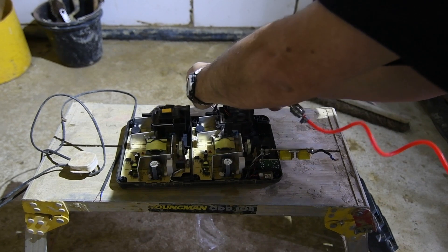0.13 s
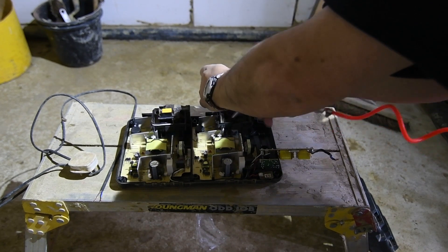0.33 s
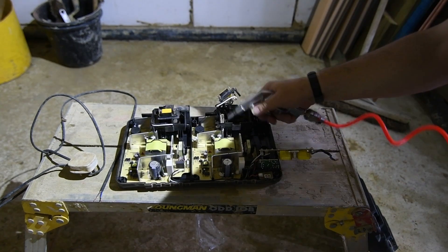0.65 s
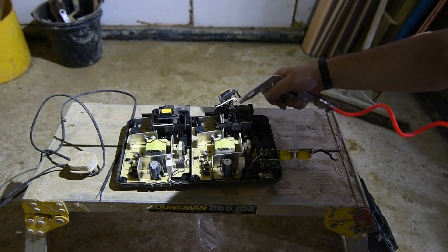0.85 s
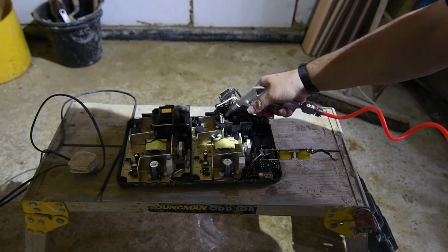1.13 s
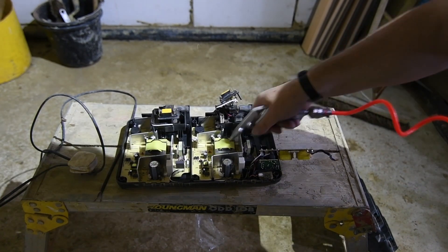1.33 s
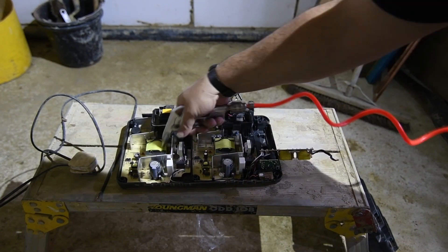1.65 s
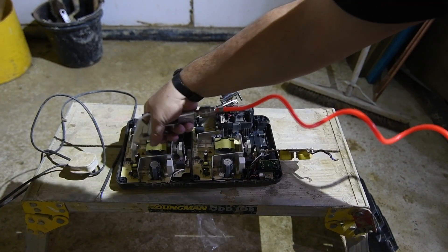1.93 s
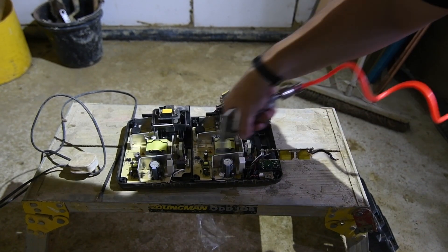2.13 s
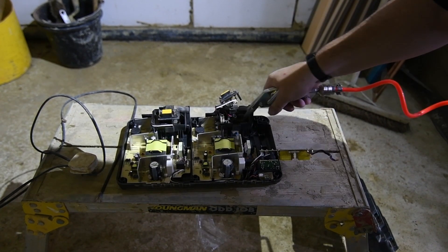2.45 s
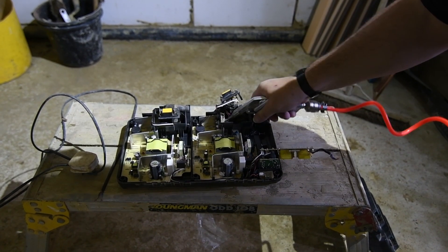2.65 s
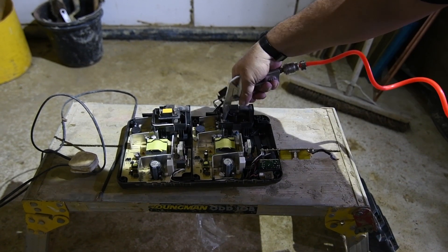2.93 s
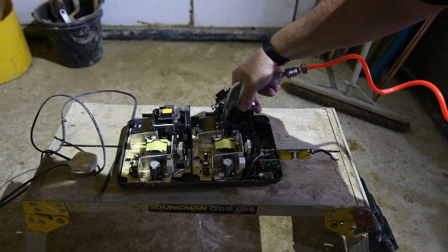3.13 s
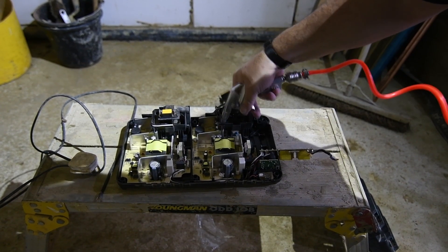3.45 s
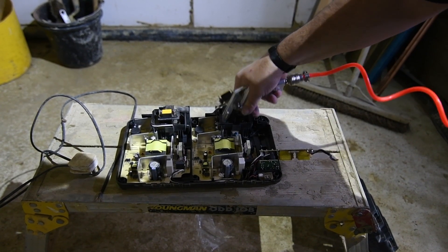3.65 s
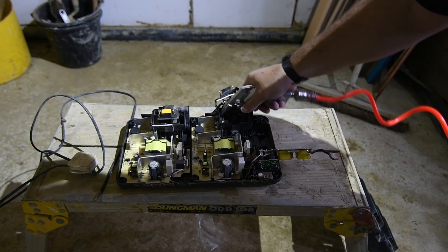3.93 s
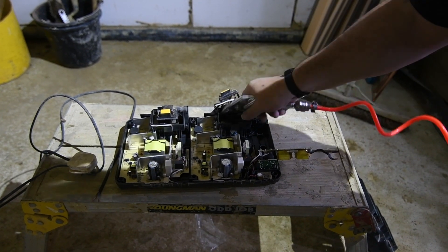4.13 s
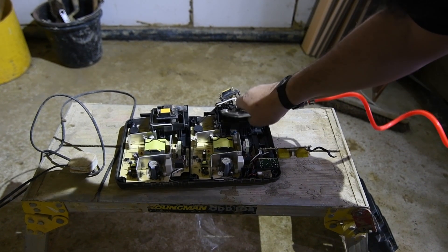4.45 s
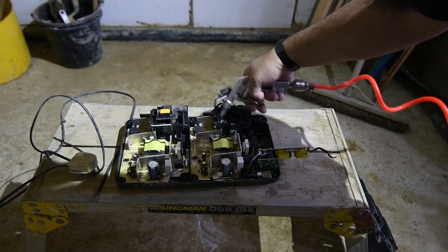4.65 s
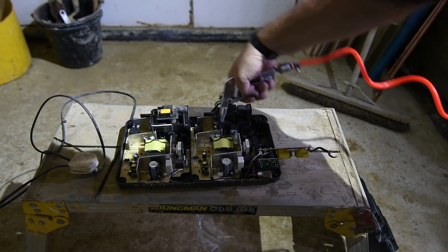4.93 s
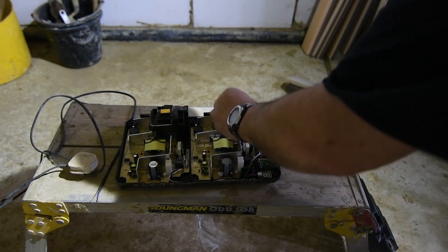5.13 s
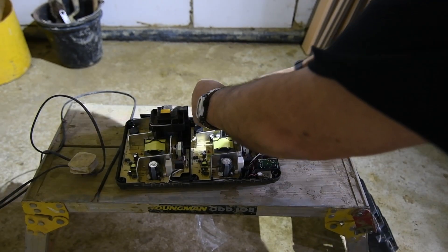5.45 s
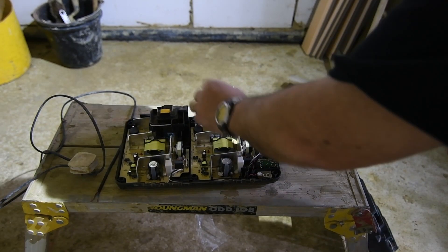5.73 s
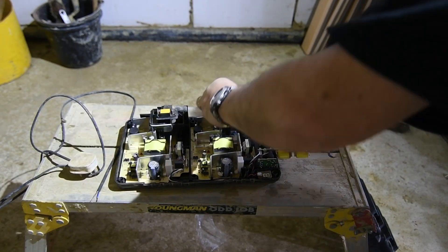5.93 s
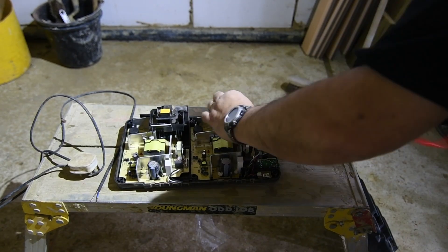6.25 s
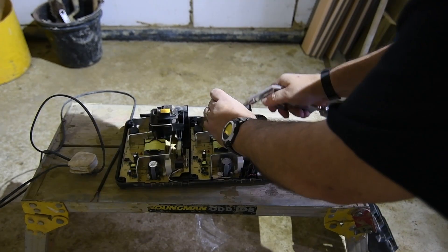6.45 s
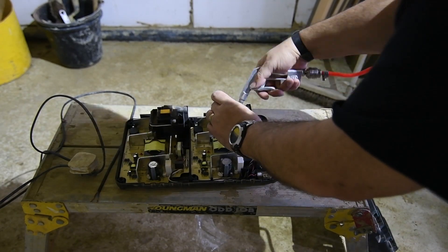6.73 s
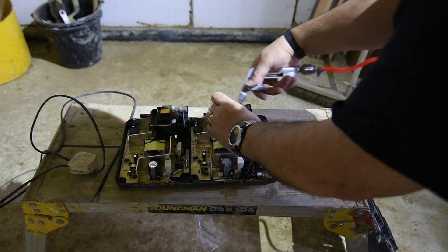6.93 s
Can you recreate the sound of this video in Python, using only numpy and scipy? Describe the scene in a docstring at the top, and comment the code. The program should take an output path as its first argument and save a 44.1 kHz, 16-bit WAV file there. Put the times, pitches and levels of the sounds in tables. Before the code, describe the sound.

Close recording of compressed air cleaning an electronic device. Harsh, treble-heavy jets start and stop abruptly, first in quick squirts, then in a long blast with shifting whistles. Hard dry spits sputter and quicken before further jets. Between them the steady buzzing whine of a small motor stands exposed, with a few tiny metallic ticks; a last blast runs to the end. Little room echo, both channels alike, loud peaks compressed.

```python
"""In a workshop, a small motor whines on while a blow gun clears dust from a battery charger's circuit boards.
The whine is a stack of wavering partials, with steady tones and a rush of noise ringing in the casing.
The jet is shaped noise in blasts; it howls through resonances where it meets gaps between parts.
Short hard spits, probably of air, and bright metallic ticks are dying noise; one run of spits quickens.
A fast compressor pushes the whine down under hard jets."""
import sys
import numpy as np
from scipy import signal
from scipy.fft import rfft, irfft
from scipy.io import wavfile
from scipy.ndimage import uniform_filter1d, map_coordinates

SR = 44100
rng = np.random.default_rng(int(sys.argv[2]) if len(sys.argv) > 2 else 0)


def output_pcm(signal):
    """Save a mono or channel-first signal as 16-bit PCM at the path in sys.argv[1].

    Samples are clipped to [-1, 1] before scaling.
    """
    pcm = np.clip(np.atleast_2d(signal).T, -1, 1) * 32767
    wavfile.write(sys.argv[1], SR, np.round(pcm).astype(np.int16))


N = 312228
T = np.arange(N) / SR   # s
HZ = np.maximum(np.arange(N // 2 + 1) * SR / N, 1)


def from_db(db):
    """Decibels to amplitude gain."""
    return 10 ** (np.asarray(db) / 20)


def rms_one(x):
    """Scale to rms 1."""
    return x / np.sqrt(np.mean(x ** 2) + 1e-20)


def in_time(rows):
    """Each column of a curve after t, drawn sample by sample."""
    s, *columns = np.transpose(rows)
    return [np.interp(T, s, column) for column in columns]


def colour(points):
    """Gain at every frequency, drawn between the points of a spectrum on a log frequency scale."""
    hz, db = np.transpose(points)
    return from_db(np.interp(np.log(HZ), np.log(hz), db))


def filtered(x, gain):
    """Apply a gain at every frequency."""
    return irfft(rfft(x) * gain, N)


def noise(gain):
    """Noise of a given colour, rms 1."""
    return rms_one(filtered(rng.standard_normal(N), gain))


def drift(rate_hz):
    """Slow random movement with rms 1, mostly below the given rate."""
    return noise(1 / (1 + (HZ / rate_hz) ** 2))


def resonate(x, hz, width):
    """One two-pole resonance with gain near 1 at its peak."""
    r = np.exp(-np.pi * width / SR)
    feedback = [1, -2 * r * np.cos(2 * np.pi * hz / SR), r * r]
    return signal.lfilter([(1 - r * r) / 2, 0, (r * r - 1) / 2], feedback, x)


def band(hz, width):
    """Noise through a resonance applied twice, rms 1."""
    once = resonate(rng.standard_normal(N), hz, width)
    return rms_one(resonate(once, hz, width))


def dying(s, t60):
    """Envelope of a burst at time s: instant start, exponential decay, cut after a quarter second."""
    envelope = np.zeros(N)
    start = round(s * SR)
    age = T[:min(SR // 4, N - start)]
    envelope[start:start + len(age)] = from_db(-60 * age / t60)
    return envelope


def workshop(x, wet_db, t60=0.07):
    """A short diffuse tail from the walls: decaying noise that starts 4 ms after the direct sound."""
    age = T[:SR // 2]
    tail = rng.standard_normal(len(age)) * from_db(-60 * age / t60) * (age > .004)
    tail = tail / np.sqrt(np.sum(tail ** 2))
    return x + from_db(wet_db) * signal.fftconvolve(x, tail)[:N]


# steady tones beside the whine: [f/Hz, rms level/dB]
SIDE_TONES = [(1200, -62.5), (5482, -47)]


def side_tones():
    """Pure tones that hold their pitch and level."""
    return np.sqrt(2) * sum(from_db(db) * np.sin(2 * np.pi * hz * T) for hz, db in SIDE_TONES)


# fundamental of the motor: [t/s, f/Hz]
MOTOR_SPEED = [(0, 279.0), (2.9, 279.2), (3.25, 279.3), (3.6, 278.8), (4.6, 278.6), (5.0, 278.7),
               (5.9, 278.6), (6.4, 278.8), (7.08, 278.7)]
# partials in rising order from 1: [multiple of the fundamental, relative level/dB]
WHINE_PARTIALS = [(1, -41.5), (2, -24), (3, -26), (4, -21), (5, -4.5), (6, -3.5), (7, -13), (8, -18.5),
                  (9, -9), (10, -12), (11, -16), (12, -15), (13, -13), (14, -16.5), (15, -13.5),
                  (16, -17.5), (17, -12.5), (18, -9.5), (19, -2), (20, -11.5), (21, -6.5), (22, -13),
                  (23, -19), (24, -25), (25, -17), (26, -48), (27, -45), (28, -13), (29, -16), (30, -22),
                  (31, -16), (32, -12), (33, -41), (34, -26), (35, -21), (36, -25), (37, -48), (38, -41),
                  (39, -19), (40, -20), (41, -26), (42, -39), (43, -30), (44, -37), (45, -17)]
# partials that follow the lean: [multiple, level change/dB at lean 0, level change/dB at lean 1]
LEAN_SHADING = [(4, 3, -10.5), (5, 0, 2.5), (6, 0, -1), (8, 1, 14.5), (9, 2.5, -10), (10, 0.5, 7),
                (11, 2, 5), (12, 5.5, -5), (15, 2.5, -3.5), (33, 12, -9)]
# the body leans to and fro and shifts the room's standing waves: [t/s, lean 0-1]
BODY_LEAN = [(0, 0.12), (1.1, 0.17), (2.3, 0.6), (2.6, .85), (3.05, 0.97), (3.5, 0.38), (4.3, 0.34),
             (4.9, 0.66), (5.45, 0.4), (6.0, 0.13), (7.08, 0.03)]
# the casing's ring near 5 kHz comes and goes: [t/s, level change/dB]
CASING_RING = [(0, 2.5), (1.1, 5.5), (1.6, -1), (2.4, -1), (2.65, 0.5), (3.5, -3), (4.1, -4), (5.1, -3),
               (5.3, 2), (5.6, 0.5), (5.95, 3.5), (6.38, 2), (6.6, -3.5), (7.08, -1)]


def whine(level_db=-36, jitter=0.00082, waver_db=1.34, fading_db=1.0):
    """Clean motor partials; high ones waver more, and each fades slowly as the standing waves shift."""
    (speed_hz,), (lean,), (ring_db,) = in_time(MOTOR_SPEED), in_time(BODY_LEAN), in_time(CASING_RING)
    phase = 2 * np.pi * np.cumsum(speed_hz * (1 + jitter * drift(23.8))) / SR
    shade_db = {round(k): upright_db + (leaning_db - upright_db) * lean
                for k, upright_db, leaning_db in LEAN_SHADING}
    # partials 18 to 21 lie around the casing's ring
    shade_db.update({18: ring_db / 2, 19: ring_db, 20: ring_db, 21: ring_db / 2})
    # groups of partials share their movements
    wavers = [drift(6) for _ in range(7)]
    fades = [fading_db * drift(.8) for _ in range(5)]
    out = np.zeros(N)
    for k, (_, db) in enumerate(WHINE_PARTIALS, 1):
        height = min(k / 20, 1.5)
        waver = height * waver_db * wavers[k % len(wavers)]
        shade = shade_db.get(k, height * fades[k % len(fades)])
        tone = np.sin(k * phase + rng.uniform(0, 2 * np.pi))
        out += from_db(db + level_db + waver + shade) * tone
    return np.sqrt(2) * out   # table levels count as rms


# colour of the motor's noise before the casing: [f/Hz, relative level per Hz/dB]
RUSH_COLOUR = [(150, -5), (400, -31), (800, -14), (1300, -8.5), (2200, 0.5), (3700, -1.5), (4500, 1),
               (7000, -1), (10000, 0.5), (10800, -4), (12000, -0.5), (13200, -3), (14200, 1), (15000, 3),
               (15700, -27)]
# resonances of the casing: [f/Hz, width/Hz, peak level/dB]
CASING_MODES = [(2345, 97, 3.7), (2787, 120, 16.2), (3350, 87, 13.3), (3960, 220, 10), (5260, 180, 20.9),
                (5910, 130, 15.4), (6240, 140, 5.1), (8300, 130, 16), (9330, 210, 16.4), (12600, 130, 2.1)]


def rush(level_db=-38.0, roughness_db=2.0, lean_db=4.0, treble_lean_db=-2.0):
    """The motor's rough noise, ringing in its casing and shaded by the lean and the ring."""
    casing_power = 1 + sum((from_db(db) ** 2 - 1) / (1 + (2 * (HZ - hz) / width) ** 2) ** 1.7
                           for hz, width, db in CASING_MODES)
    (lean,), (ring_db,) = in_time(BODY_LEAN), in_time(CASING_RING)
    low_cut = 1 / (1 + (250 / HZ) ** 6)
    whole = noise(colour(RUSH_COLOUR) * np.sqrt(np.abs(casing_power)) * low_cut)
    low, below_treble = [filtered(whole, 1 / (1 + (HZ / hz) ** 12)) for hz in (3600, 7000)]
    middle, treble = below_treble - low, whole - below_treble
    out = low * from_db(lean_db * lean) + middle * from_db(0.18 * ring_db)
    out += treble * from_db(treble_lean_db * (lean - 2.0))
    return from_db(level_db + roughness_db * drift(70)) * out


# light metallic ticks as the hand moves: [t/s, level before the low cut/dB, f/Hz]
TICKS = [(5.606, -26, 10800), (5.641, -28, 10100), (5.668, -33, 13600)]


def ticks(t60=0.036, width=2500):
    """Small bright touches of metal: dying bands of noise with the lows cut."""
    touches = sum(from_db(db) * dying(s, t60) * band(hz, width) for s, db, hz in TICKS)
    return signal.sosfilt(signal.butter(2, 5000, "high", fs=SR, output="sos"), touches)


# dull pops as the blast catches the case: [t/s, level/dB, decay t60/s]
POPS = [(1.658, -13, 0.005), (6.906, -29, 0.03)]


def pops(top_hz=3400):
    """A short push on the case: dying noise, dull in tone."""
    push = sum(from_db(db) * dying(s, t60) for s, db, t60 in POPS)
    return push * noise(1 / (1 + (HZ / top_hz) ** 8))


def quickening_spits(count=12, start_s=3.184, gap_s=.0229, quickens_s=.00048, t60=.034):
    """A quickening run of short spits, probably of air, mostly growing harder."""
    k = np.arange(count)
    s = start_s + gap_s * k - quickens_s * k * (k - 1) / 2
    first_db, last_db, scatter_db = -24, -16.5, 1.0   # relative, like the other spits
    db = np.linspace(first_db, last_db, count) + scatter_db * rng.standard_normal(count)
    return [(at, level, t60) for at, level in zip(s, db)]


# short hard spits, probably air spurting from the trigger or nozzle: [t/s, relative level/dB, decay t60/s]
SPITS = [(0.484, -16, 0.037), (0.529, -20, 0.039), (2.455, -27, 0.024), (2.905, -21, .02),
         (3.161, -21, 0.089), (3.4606, -22, 0.074), (3.5085, -28, 0.031), (3.5768, -29, 0.027),
         (3.6091, -17.5, .016), (3.6531, -20.5, 0.056), (3.6979, -19, 0.068), (3.7203, -18, 0.062),
         (3.7862, -15, 0.024), (3.95, -14, 0.049), (4.181, -27, .03), (4.245, -17, 0.073),
         (4.556, -18, 0.037), (4.629, -20, .025), (4.661, -19, 0.066), (4.718, -12, 0.0097),
         (4.868, -21, 0.038), (4.94, -19, 0.029), (5.296, -25, 0.091), (6.906, -11, 0.053)]
# colour of every spit and rattle: [f/Hz, relative level per Hz/dB]
SPIT_COLOUR = [(40, -38), (250, -42), (700, -14), (1800, -11), (2350, 0.5), (2800, 9.5), (3500, 1.5),
               (4500, 5), (6200, 10), (8000, 5), (10500, 6.5), (12500, -2), (16000, -2.5)]


def spits(air, level_db=1, edge_db=-8, edge_t60=0.0095, rattles_per_s=22, rattle_db=-25,
          rattle_t60=0.021):
    """Short hard spits: dying noise with a faster edge; the air also rattles small parts at random."""
    bursts = np.zeros(N)
    for s, db, t60 in [*SPITS, *quickening_spits()]:
        bursts += from_db(db) * (dying(s, t60) + from_db(edge_db) * dying(s, edge_t60))
    struck = rng.random(N) < rattles_per_s / SR
    rattles = struck * np.minimum(air, 1) * from_db(rattle_db + rng.uniform(-16, 2.9, N))
    decay = from_db(-60 / (rattle_t60 * SR))   # per sample
    bursts += signal.lfilter([1], [1, -decay], rattles + 1e-18)
    return from_db(level_db) * bursts * noise(colour(SPIT_COLOUR))


# trigger held: [opens t/s, closes t/s, base level/dB, level change over the blast/dB, base nozzle sizzle/dB]
BLASTS = [(0.0, 0.133, -15.5, 0, 0), (0.158, 0.198, -20.5, 4, 1.5), (0.212, 0.252, -14.5, 5, -4),
          (0.27, .535, -19, -8, 1), (.615, 0.815, -17, 1, 3), (0.858, 0.95, -18.5, 4, 1.5),
          (0.983, 1.328, -18, -6.5, 1), (1.354, 2.888, -19.5, -2.5, 4.5), (2.888, 2.928, -38, 0, 15),
          (2.93, 3.029, -23, 2, 5), (3.855, 4.211, -18.5, 1.5, 1.5), (4.343, 4.865, -21, 7, 2),
          (4.884, 5.082, -16, 5, 3), (5.314, 5.523, -17, 1, 0), (6.441, 7.077, -19, 1.5, 0)]


def valve(open_s=.0028, close_t60=0.053, kick_db=6, kick_s=0.02, refill_s=0.028):
    """The valve snaps open with a kick of stored pressure, which a pause refills, and closes more softly."""
    flow, closed = np.zeros(N), -1
    for opens, closes, *_ in BLASTS:
        age = np.maximum(T - opens, 0)
        stored = min((opens - closed) / refill_s, 1)
        kick = from_db(stored * kick_db * np.exp(-np.minimum(age / kick_s, 20)))
        closing = from_db(-60 * np.clip((T - closes) / close_t60, 0, 2))
        flow += np.minimum(age / open_s, 1) * kick * closing
        closed = closes
    return flow


# the nozzle nears and leaves the parts, one curve per long blast: [t/s, level change/dB]
NOZZLE_SWEEPS = [
    [(1.36, 2), (1.5, 2), (1.58, -3), (1.66, 5), (1.8, -4), (2.02, 11.5), (2.12, 2), (2.22, 10.5),
     (2.44, 7.5), (2.54, -0.5), (2.72, 1), (2.88, -2)],
    [(3.86, -1), (4.03, -1), (4.12, 5), (4.22, -3)],
    [(4.35, 0.5), (4.57, 4), (4.66, 1.5), (4.76, -3), (4.87, -2)],
    [(4.885, -15), (4.94, -7), (5.02, -9.5), (5.08, 2)],
    [(6.44, -1), (6.55, 2), (6.72, -2.5), (6.86, -6), (6.96, 11), (7.08, 2)],
]


def aim():
    """Jet strength and sizzle in dB: each blast has its own, and sweeps of the nozzle bend the strength."""
    current = np.maximum(np.searchsorted([row[0] for row in BLASTS], T, "right") - 1, 0)
    opens, closes, strength_db, change_db, sizzle_db = np.array(BLASTS)[current].T
    progress = np.clip((T - opens) / (closes - opens), 0, 1)
    sweep_db = sum(np.interp(T, *np.transpose(sweep), left=0, right=0) for sweep in NOZZLE_SWEEPS)
    return strength_db + change_db * (progress - .5) + sweep_db, sizzle_db


def board_echo(x, delay_ms, sway, share):
    """A reflection off the board combs the hiss; the comb moves with the nozzle."""
    lag = delay_ms / 1000 * SR * np.exp(sway * drift(2.6))
    return x + share * map_coordinates(x, [np.arange(N) - lag], order=3, mode="nearest")


# colour of the jet before its zones are balanced: [f/Hz, relative level per Hz/dB]
JET_COLOUR = [(15, -40), (25, -24.5), (881, -22), (1090, -24), (1180, -20.5), (1360, -21), (1590, -19),
              (1730, -18.5), (2090, -18), (2810, -14.5), (3220, -13), (5370, -5), (8490, -3), (11100, -1.5),
              (15800, -2)]
# the jet crosses a gap or an edge: [middle t/s, length t/s, f/Hz, nominal width/Hz, level re jet/dB]
HOWLS = [(0.236, .025, 10900, 2500, -7), (0.537, 0.016, 2800, 300, -5), (0.898, 0.046, 13600, 1300, -2),
         (0.99, .05, 8500, 400, -9), (1.277, 0.054, 2960, 500, -14.5), (2.012, 0.15, 10500, 900, -1.5),
         (2.2, 0.41, 7300, 1200, -11), (2.222, 0.066, 10070, 850, 0), (2.38, 0.18, 9300, 1500, -5),
         (2.69, 0.028, 11200, 350, -2), (2.68, .35, 12800, 700, -12), (4.112, 0.17, 10400, 1800, -2.5),
         (4.583, 0.43, 11600, 700, -10), (4.79, 0.2, 2780, 400, -16.5), (5.4, 0.26, 12200, 800, -11),
         (6.581, 0.31, 10900, 1200, -3.5), (6.98, 0.61, 10700, 1500, -6.5), (6.981, 0.023, 4260, 2400, -6)]


def jet(flutter_db=1.62, patchy_db=2.5, wander_db=0.6):
    """Turbulent hiss in four zones, brighter as it hits harder, with resonances where it crosses gaps."""
    strength_db, sizzle_db = aim()
    gained_db = strength_db + 18   # above the strength at the usual working distance
    # roar off the board and nozzle sizzle fall behind for each dB that the jet gains
    roar_db = 2 - 0.33 * gained_db + wander_db * drift(18)
    sizzle_db = sizzle_db - 0.1 * gained_db + wander_db * drift(15)
    air = noise(colour(JET_COLOUR))
    below = [1 / (1 + (HZ / hz) ** 6) for hz in (700, 4800, 12300)]
    zones = np.diff([0 * HZ, *below, 0 * HZ + 1], axis=0)
    rumble, roar, hiss, sizzle = [filtered(air, zone) for zone in zones]
    out = rumble * from_db(2.0 * np.tanh(drift(25)) + 0.17 * roar_db)
    out += roar * from_db(roar_db - 1.5 + 1.7 * drift(30))
    out += hiss * from_db(patchy_db * drift(16))
    out += sizzle * from_db(sizzle_db + patchy_db * drift(55))
    power = np.ones(N)
    for s, length, hz, width, db in HOWLS:
        swell = from_db(db) * np.exp(-2 * np.minimum(((T - s) / length) ** 2, 20))
        out += swell * band(hz, width * 1.66)   # widened, as the second pass narrows the band
        power += swell ** 2
    # a howl takes its share of the jet's power
    out = board_echo(out / np.sqrt(power), delay_ms=.9, sway=0.13, share=0.12)
    return out * from_db(strength_db + flutter_db * drift(34))


def scene():
    """Blow gun and parts sound in the room over the dry motor; both channels are alike."""
    motor = whine() + side_tones() + rush()
    air = valve()
    work = air * jet() + spits(air) + pops() + ticks()
    mono = workshop(work, wet_db=-24.5) + motor
    return np.array([mono, mono])


def record(dry, threshold_db=-20.0, squeeze=0.84, release_db_per_s=500, attack_s=0.00049):
    """A fast compressor turns loud moments down, peaks are rounded, then the top is cut steeply."""
    level_db = 10 * np.log10(np.maximum(uniform_filter1d(dry[0] ** 2, size=180), 1e-12))
    over_db = np.maximum(level_db - threshold_db, 0)
    # hold each peak and let it fall at the release rate
    held_db = np.maximum.accumulate(over_db + release_db_per_s * T) - release_db_per_s * T
    r = np.exp(-1 / (attack_s * SR))
    reduction_db = squeeze * signal.lfilter([1 - r], [1, -r], held_db)
    out = dry * from_db(-reduction_db)
    out = out / (1 + (out / .35) ** 8) ** (1 / 8)   # peaks stay below 0.35 before the top cut
    cutoff_hz = 15750
    return filtered(out, 1 / np.sqrt(1 + (HZ / cutoff_hz) ** 800))


dry = scene()
out = record(dry)
output_pcm(out)
```